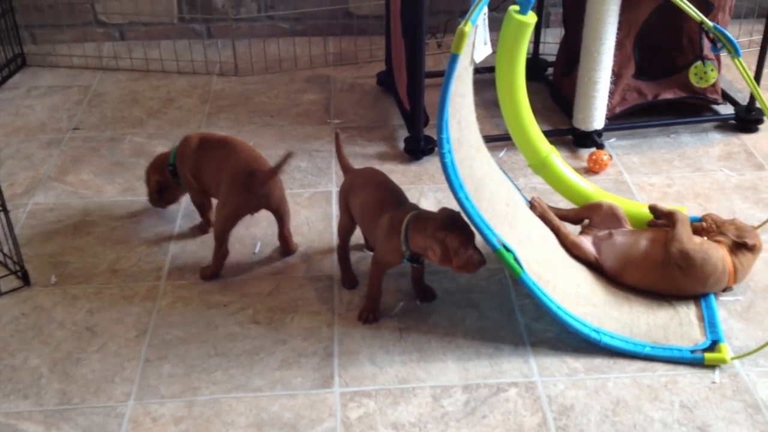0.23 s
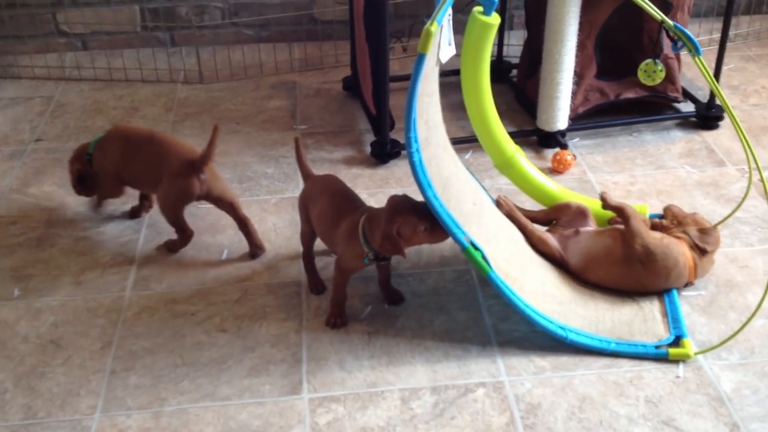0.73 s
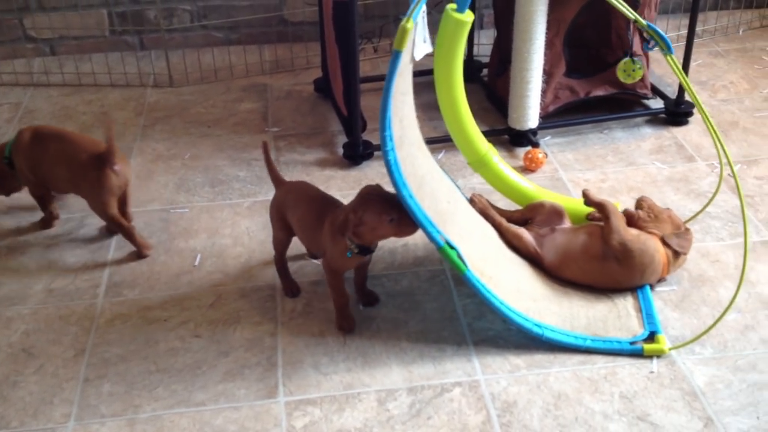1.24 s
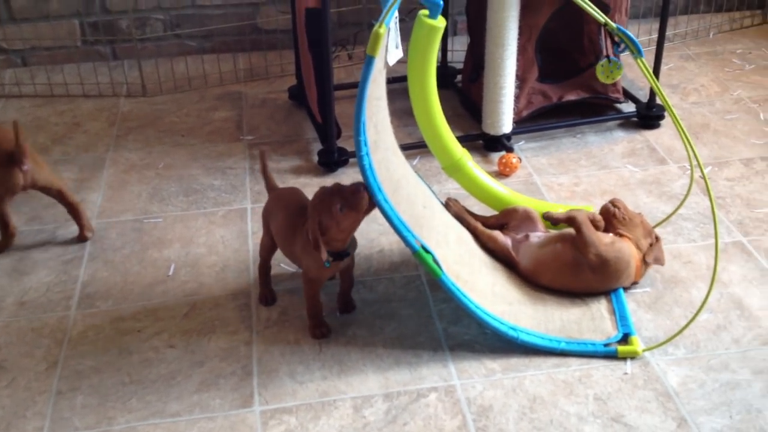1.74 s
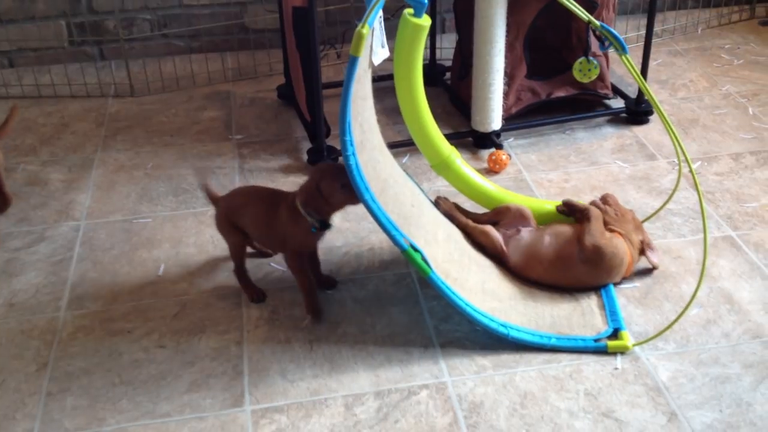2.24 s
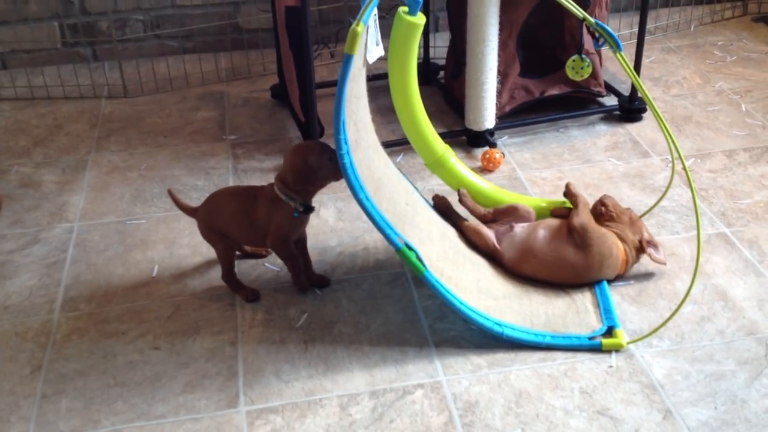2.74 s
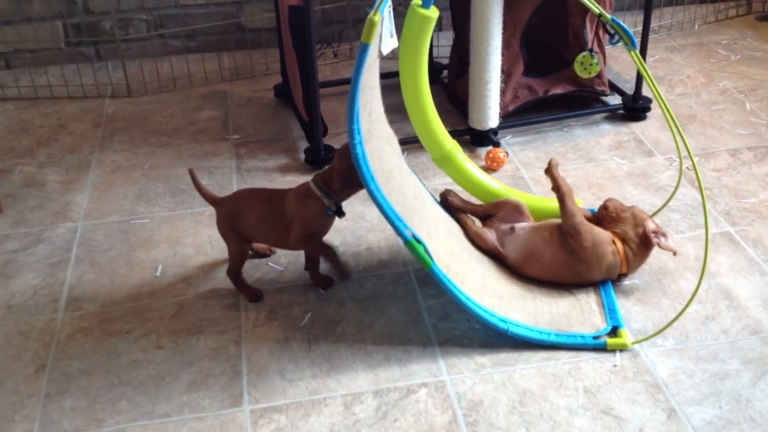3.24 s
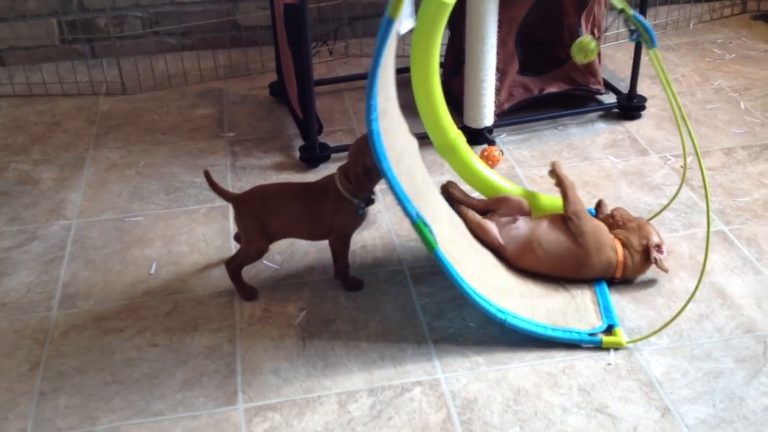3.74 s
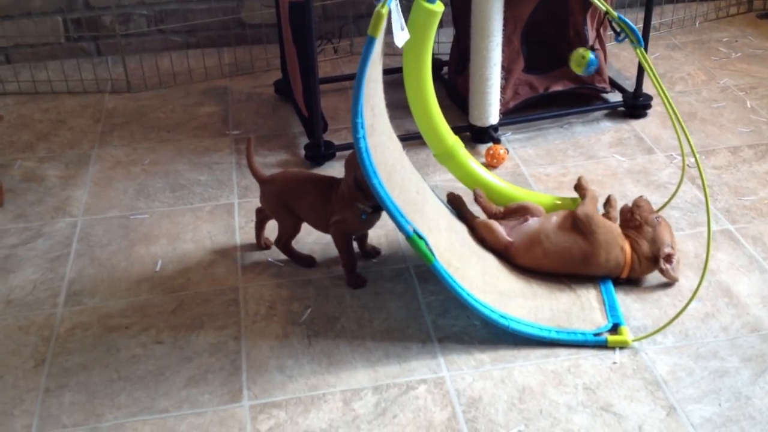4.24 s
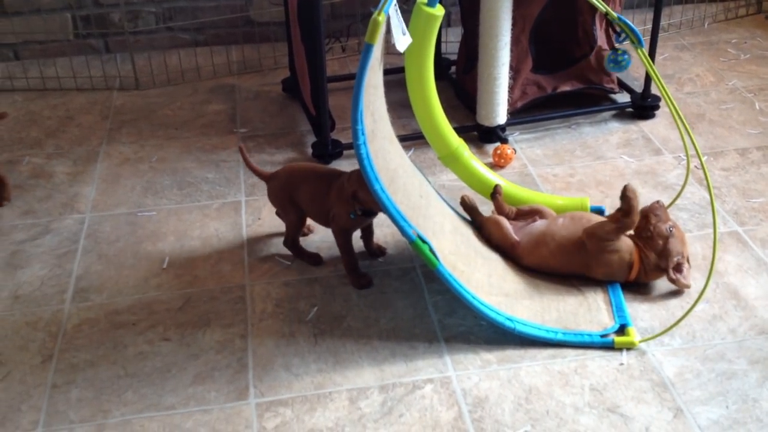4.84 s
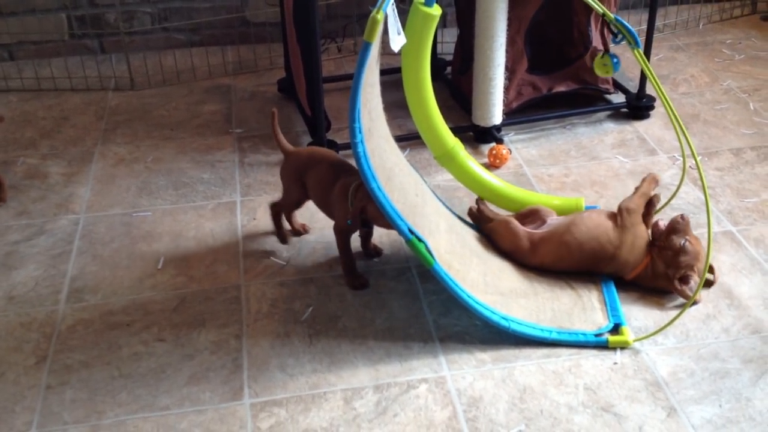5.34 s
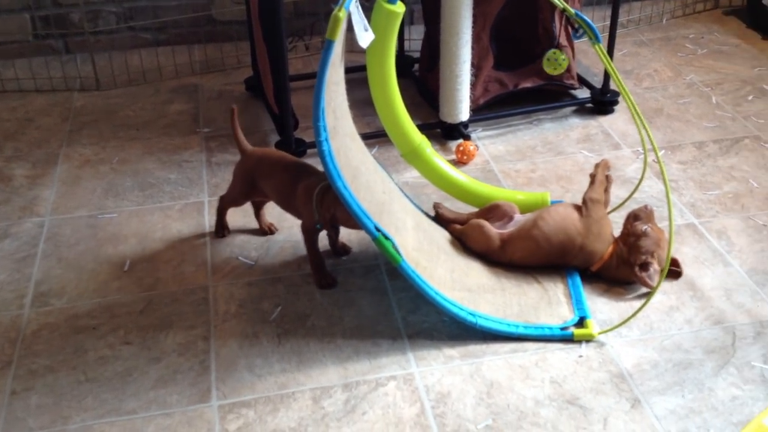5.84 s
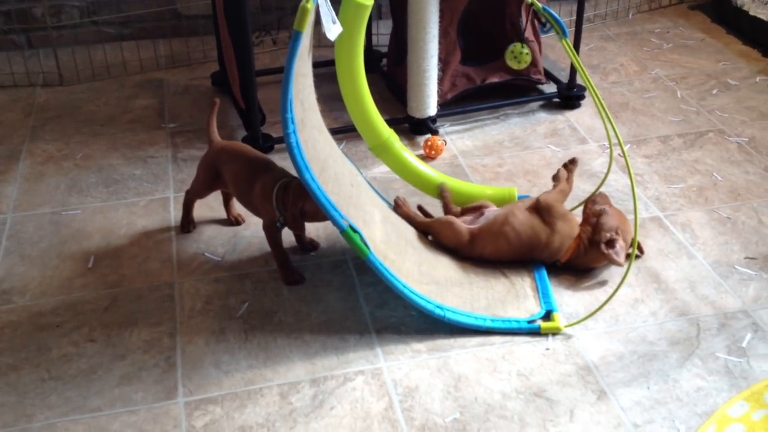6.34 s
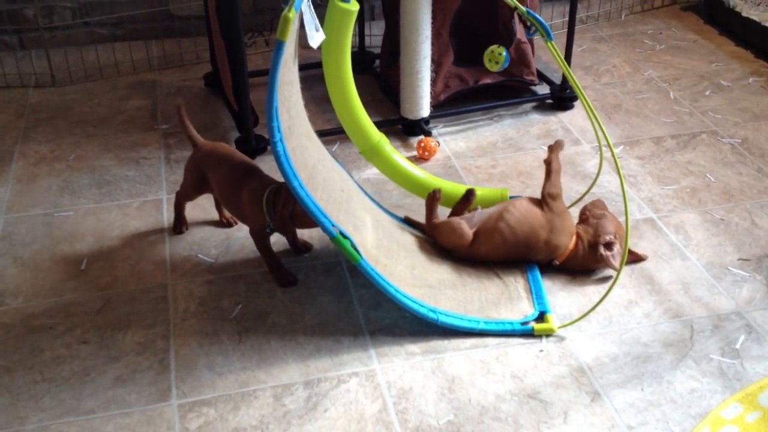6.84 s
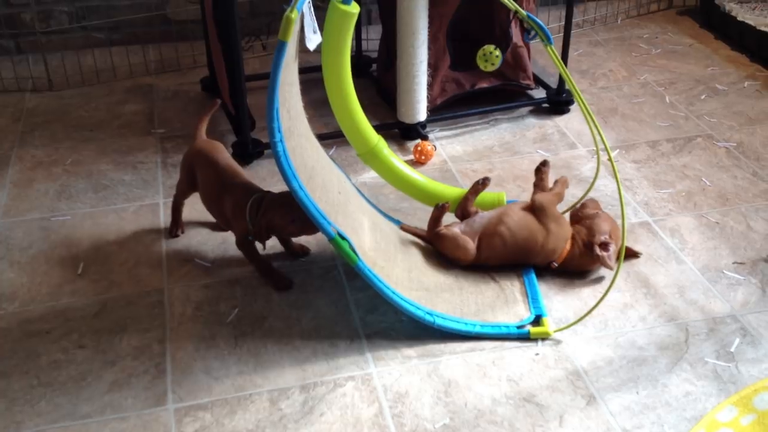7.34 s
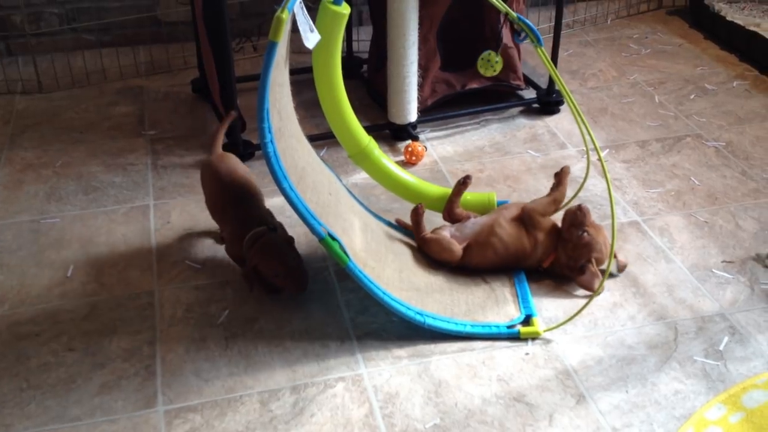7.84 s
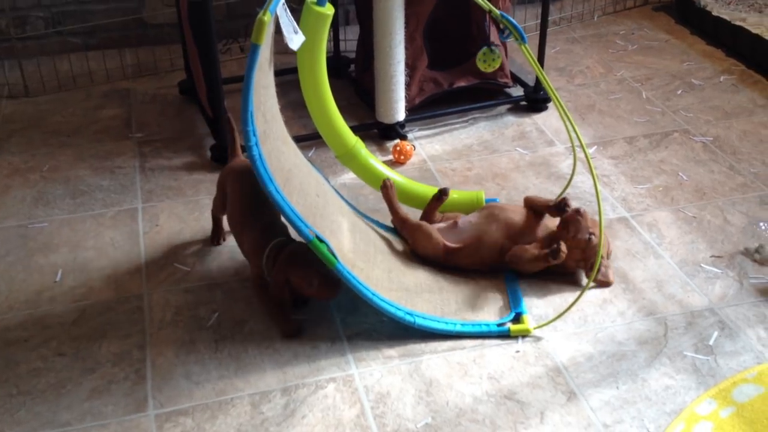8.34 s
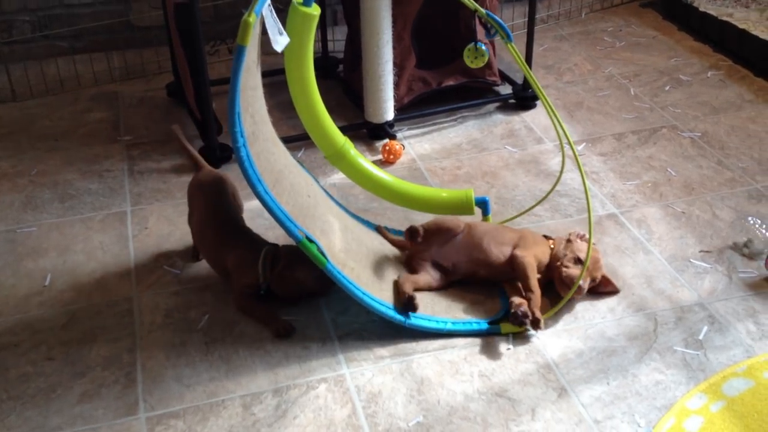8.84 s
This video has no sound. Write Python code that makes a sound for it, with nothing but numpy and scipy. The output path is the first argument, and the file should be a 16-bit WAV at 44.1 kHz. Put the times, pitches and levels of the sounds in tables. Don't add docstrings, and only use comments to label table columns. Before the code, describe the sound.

Puppies play on a tiled indoor floor a few metres from a small microphone. Light claws tick and skid, with a sharp cluster near one second. Around four seconds a hard snap and hollow frame knocks set a small bell ball rattling brightly. Later come one pinging tap, a low thud and a damped collar bell jingle, over soft rustling and quiet house hum.

```python
import sys
import numpy as np
from scipy import signal
from scipy.fft import rfft, irfft
from scipy.io import wavfile
from scipy.ndimage import uniform_filter1d

SR = 44100
rng = np.random.default_rng(int(sys.argv[2]) if len(sys.argv) > 2 else 0)


def pcm_store(signal):
    levels = np.round(np.clip(np.atleast_2d(signal), -1, 1) * 32767)
    wavfile.write(sys.argv[1], SR, levels.astype(np.int16).T)


def volts(x):
    e = np.asarray(x, float) / 20
    return 10 ** e


N = 400428

# start_s, peak_db, ring_hz, treble_db
TAPS = [(0.4562, -51, 1340, -21), (0.6416, -48, 4260, -17), (0.67, -50, 2170, -11),
        (0.7208, -34.5, 2510, -11), (0.7255, -33.5, 2860, -6), (0.9822, -24, 2870, 2),
        (1.2945, -50, 4020, -5), (2.739, -38, 2830, -4), (3.358, -44, 3390, 2.5), (3.3889, -36, 3580, -7),
        (3.658, -39.5, 3100, -5), (4.0945, -30, 4200, -1), (4.2238, -24.5, 2600, -6),
        (4.4127, -24.5, 3500, -1.5), (4.942, -40, 1470, -25), (6.7334, -41, 3500, -17),
        (8.398, -45, 2560, -11), (8.6557, -40, 3020, 1)]
TAPS_FAR = [(0.551, -53.5, 2350, -10), (0.828, -53, 3420, 1), (0.8444, -47.5, 1940, 7),
            (0.855, -43.5, 3400, -5), (1.4919, -52.5, 3300, -10), (1.717, -43, 1430, 8.5),
            (3.1512, -53, 2510, -19), (3.1852, -53, 1750, -13), (3.5472, -45, 1270, 7.5),
            (4.7325, -49.5, 1410, -10), (5.066, -48.5, 1240, -27), (6.0254, -45, 1510, 4),
            (6.1441, -40, 2750, -28), (6.3838, -38.5, 3400, -40), (6.543, -45.5, 1440, -1),
            (8.5225, -49, 4000, -12), (8.765, -51.5, 3130, -30), (9.0255, -48, 2750, 3)]
SNAPS = [(0.7506, -46, 2360, -27), (3.9698, -17, 3500, -1.5), (7.3324, -32.5, 3600, -9),
         (0.8548, -32, 3200, 1), (0.8615, -39, 3300, -8), (0.7, -47, 4000, 0), (0.9895, -26.5, 2800, -8),
         (0.9935, -29, 2900, -8), (0.9965, -31, 3000, -4), (1.0705, -32, 3200, -10),
         (1.0775, -39, 3300, -12), (1.2945, -42.5, 4200, 2), (1.1, -41, 4000, -8), (1.54, -48, 4500, 1),
         (2.1095, -44, 3500, -7), (2.7, -45, 3400, -10), (2.5, -41, 2700, -6), (6.9, -43, 5500, 0),
         (5.6, -46, 4500, 4), (7.1467, -47.5, 3140, -6), (3.027, -49, 4200, -6), (3.1, -42, 3000, -10),
         (0.9, -46, 5000, 4), (8.002, -45, 5500, 5)]
PINGS = [
    (1.071, -36, 3150, -14),
    (1.078, -32, 3300, -18),
    (2.108, -45.5, 2010, 9),
    (5.4155, -46, 2100, -9),
    (5.5008, -39.5, 3960, -1),
    (5.7198, -25, 2700, -22),
]
CRACKS = [
    (3.9698, -31.5, 3500, 9),
    (4.1066, -63, 4900, 0),
    (4.124, -69, 5200, 11),
    (4.4128, -38, 2700, -8),
    (6.3838, -41.5, 3040, 4),
]
# start_s, peak_db, ring_hz
KNOCKS = [
    (0.9821, -37.5, 1670),
    (3.9706, -31.5, 1184),
    (4.2212, -41.5, 1420),
    (4.413, -45, 1190),
    (5.7198, -42.5, 2000),
]
# start_s, peak_db, ring_hz
BOOMS = [
    (0.982, -51, 700),
    (3.97, -49.5, 780),
    (4.224, -47.5, 543),
    (4.413, -47.5, 790),
]


def taps():
    hollow_treble_db = -35
    kinds = [  # touches, echo_db, broad_db
        (TAPS, -7.5, 1.4), (TAPS_FAR, -1.2, 4.9), (SNAPS, -27, 1), (PINGS, -11.5, -16), (CRACKS, 0.3, 7.8),
        ([(*row, hollow_treble_db) for row in KNOCKS], 2, 0.21),
        ([(*row, hollow_treble_db) for row in BOOMS], -2.3, 8.5)]
    near, far = np.zeros(N), np.zeros(N)
    t = np.arange(int(.11 * SR)) / SR
    blow = 1. * (np.arange(len(t)) == int(.0012 * SR))
    for touches, echo_db, broad_db in kinds:
        for start_s, peak_db, ring_hz, treble_db in touches:
            slips = .2 * rng.standard_normal(len(t)) * np.exp(-t / .002)
            add(near, start_s, volts(peak_db) * touch(blow + slips, ring_hz, treble_db, broad_db))
            add(far, start_s, volts(peak_db + echo_db + 12) * touch(blow, ring_hz, treble_db, broad_db))
    return near, far


# start_s, peak_db, ring_hz, treble_db, length_ms
SKIDS = [(.131, -42, 3500, -4, 13), (0.134, -47.5, 3070, -33, 37), (0.727, -39, 2650, -11, 7),
         (0.745, -43, 1860, -20, 22), (0.942, -48, 2720, -20, 18), (1.545, -44.5, 2190, -22, 50),
         (1.6, -44, 1950, -16, 25), (1.692, -42, 4540, -0.5, 3.5), (1.924, -44, 2380, -1, 7),
         (1.929, -31.5, 1900, -23, 8.5), (1.932, -42, 2180, -22, 3.5), (2.257, -49.5, 2550, 1.5, 32),
         (2.303, -43, 1420, -11, 43), (3.74, -48, 2393, -12, 35), (3.80, -49, 2280, -15, 45),
         (3.84, -54, 2170, -11, 19)]
DRAGS = [
    (1.93, -38.5, 1170, -27, 10),
    (2.33, -44.5, 1070, -30, 16),
    (3.209, -32, 1710, -23, 9.3),
    (3.222, -40, 1240, -30, 11),
    (3.571, -42.5, 1110, -10, 28),
]
SCRAPES = [
    (0.726, -34, 2750, -22, 12),
    (7.885, -45, 7200, -0.5, 35),
    (7.9, -38, 2900, -20, 30),
    (7.862, -47, 4200, -4, 50),
    (7.876, -37, 3500, -10, 30),
    (7.892, -33, 2200, -25, 14),
]


def skids():
    near, far = np.zeros(N), np.zeros(N)
    t = np.arange(int(.11 * SR)) / SR
    for rows, echo_db, kind_broad_db in [(SKIDS, 8.26, 0), (DRAGS, 10, -7), (SCRAPES, -3, -7)]:
        for start_s, peak_db, ring_hz, treble_db, length_ms in rows:
            slip = rng.standard_normal(len(t))
            age = t * 3000 / length_ms
            force = even(age * np.exp(-age) * slip * np.abs(slip), 340)
            broad_db = kind_broad_db + 9 * np.log2(ring_hz / 2600)
            skid = volts(peak_db) * touch(force, ring_hz, treble_db, broad_db)
            add(near, start_s, skid)
            add(far, start_s, volts(echo_db) * skid)
    return near, far


def touch(force, ring_hz, treble_db, broad_db):
    body = band(force, ring_hz / 1.084, ring_hz * 1.11)
    crack = band(force, ring_hz / 1.62, min(ring_hz * 2.13, 5600), order=3)
    tick = band(force, 5700, 12350)
    parts = [(-10, body), (broad_db, crack), (treble_db, tick)]
    return sum(volts(db) * part / np.abs(part).max() for db, part in parts)


# start_s, peak_db, upper_db, t60_s
COLLAR = [(0.587, -68, 2, 0.61), (0.62, -58, -4, 0.1), (1.012, -55, -15, 0.1), (1.031, -49, -11, 0.12),
          (1.073, -54, -12, 0.18), (1.1492, -49.5, -15, 0.3), (1.208, -49.5, -7, 0.16),
          (1.248, -50, -10, 0.2), (2.04, -51.5, -17, 0.16), (2.0826, -54, -8, 0.43),
          (2.105, -52, -14, 0.17), (2.172, -59, -12, 0.15), (2.245, -50.5, -10, 0.3),
          (2.268, -48.5, -8, 0.12), (2.307, -53.5, -3, 0.22), (2.3675, -60, -8, 0.3),
          (2.685, -62, -12, 0.3), (3.4, -64, -15, 0.3), (3.44, -62, -15, 0.38), (5.5378, -68.5, -4, 0.26),
          (6.096, -60, -5, 0.18), (6.2232, -58, -7, 0.078), (6.2734, -64, -17, 0.091),
          (6.5015, -56.5, -10, 0.059)]
COLLAR_TURN = [(6.7963, -48.5, -35, 0.091), (6.8737, -50, -7, 0.23), (6.8834, -60, 7, 0.13),
               (6.9864, -63, 1, 0.066), (7.1735, -55, -8, 0.04), (7.3098, -49.5, -15, 0.16),
               (7.3553, -45, -5, 0.11), (7.3733, -39.5, -8, 0.057), (7.4108, -53, -29, 0.24),
               (7.534, -51.5, -23, 0.038), (7.7432, -50, -32, 0.074), (8.1119, -67, -25, 0.1),
               (8.169, -56.5, -29, 0.11), (8.181, -53, -12, 0.11), (7.975, -50.5, -6, 0.055),
               (8.312, -54, -6, 0.1), (8.3248, -43, -7, 0.3), (8.341, -45.5, -9, 0.097),
               (8.524, -59.5, 2, 0.18), (8.5943, -59, -9, 0.11), (8.6114, -53, -3, 0.15),
               (8.9235, -58, -25, 0.035)]
COLLAR_MUTED = [
    (7.3163, -34, -9, 0.023),
    (7.331, -29, -26, 0.01),
    (7.933, -23, -18.5, 0.011),
    (8.1915, -41, -15, 0.022),
]
# mode_hz, level_db, phase_rad
COLLAR_LOW = [(4250, -6, 2.9), (4300, 9.5, 0.54)]
# mode_hz, level_db
COLLAR_HIGH = [(10520, 0), (10810, -1), (11700, -18)]
# start_s, peak_db
PEA_TICKS = [(6.8834, -40), (7.309, -40), (7.3165, -34), (7.32, -33), (7.3565, -33), (7.36, -35),
             (7.3735, -28), (7.743, -44), (7.384, -45), (7.391, -51), (7.934, -40), (7.977, -45)]


def collar():
    out, t = np.zeros(N), np.arange(int(.5 * SR)) / SR
    strikes = np.array(sorted(list(COLLAR) + list(COLLAR_TURN) + list(COLLAR_MUTED)))
    waits_s = np.diff(strikes[:, 0], append=99)
    tick = band(1. * (t == 0), 5840, 7900)
    for (start_s, peak_db, upper_db, t60_s), wait_s in zip(strikes, waits_s):
        turn = rng.uniform(0, 2 * np.pi, 7)
        detune = 1 + 0.00046 * (turn[-1] - np.pi)
        low = sum(volts(db) * ring(t, hz * detune, t60_s, phase) for hz, db, phase in COLLAR_LOW) / 1.13
        high = sum(volts(db + turn[-2] - np.pi) * ring(t, hz, 0.017 + t60_s * .5, phase)
                   for (hz, db), phase in zip(COLLAR_HIGH, turn))
        attack_s = 0.0018 if t60_s < .026 else 0.00054 + 0.0084 * t60_s
        damp = fade(np.maximum(t - wait_s, 0), 0.04)
        tone = (low + volts(upper_db + 6.0) * high) * (1 - np.exp(-t / attack_s)) * damp
        add(out, start_s, volts(peak_db) * (tone + volts(upper_db + 27) * tick))
    for start_s, peak_db in PEA_TICKS:
        add(out, start_s, volts(peak_db) * ring(t, 6600, .0045))
    brush = unit(band(rng.standard_normal(N), 25, 130, order=1))
    return out * volts(1.3 * brush) + chimes(brush) + pea_roll(strikes)


# start_s, peak_db, pitch_hz, t60_s
TAGS = [(1.325, -59, 4800, 0.3), (1.36, -56, 4770, 0.4), (1.399, -66, 4800, 0.25), (2.469, -60, 6850, 0.16),
        (2.529, -54, 6800, 0.082), (3.74, -55.5, 4770, 0.43), (4.165, -41, 3570, 0.077),
        (4.52, -55, 3560, 0.24), (0.914, -56, 4600, .2), (1.195, -56, 6520, .15), (4.219, -39, 2580, .13),
        (4.745, -54, 1420, .25)]
SHELL = [
    (4.011, -49, 5360, .9),
    (4.1, -51, 5360, .9),
    (4.24, -49, 5360, .8),
    (4.13, -53, 5100, .9),
    (4.45, -54, 5100, .9),
    (4.449, -51, 5360, 1.1),
    (4.56, -53, 5360, .9),
    (4.84, -58, 5360, .8),
]


def chimes(brush):
    out, t = np.zeros(N), np.arange(int(.5 * SR)) / SR
    chatter = volts(2.5 * brush)
    for start_s, peak_db, pitch_hz, t60_s in TAGS + SHELL:
        tone = ring(t, pitch_hz, t60_s) * (1 - np.exp(-t / 0.0047))
        add(out, start_s, volts(peak_db) * tone * chatter[int(start_s * SR):][:len(t)])
    return out


def pea_roll(strikes):
    t = np.arange(int(.5 * SR)) / SR
    shaken = volts(1) * stirring()
    for start_s, peak_db, _, t60_s in strikes:
        add(shaken, start_s, volts(peak_db) * t60_s / 0.25 * fade(t, 0.3))
    low = unit(band(rng.standard_normal(N), 4262, 4312, order=1))
    high = unit(band(rng.standard_normal(N), 10600, 10640))
    return volts(-16.5) * shaken * (low + 0.18 * high)


# start_s, peak_db, pitch_hz, t60_s
BALL = [(3.5502, -45, 8500, 0.071), (3.6006, -44.5, 8400, 0.088), (3.627, -34.5, 8200, 0.049),
        (3.679, -39, 8200, 0.12), (3.971, -29, 8560, 0.042), (4.0941, -20, 8450, 0.035),
        (4.107, -27, 8500, 0.04), (4.125, -23, 8550, 0.043), (4.1372, -24.5, 8480, 0.074),
        (4.144, -32, 8580, 0.06), (4.2332, -39, 8170, 0.068), (4.283, -40, 8600, 0.074),
        (4.3035, -37, 8500, 0.1), (4.313, -34, 8500, 0.05), (4.322, -33.5, 8400, 0.11),
        (4.332, -37, 8500, 0.05), (4.346, -38, 8500, 0.06), (4.3828, -42, 8500, 0.047),
        (4.4132, -29.5, 8500, 0.037), (4.4836, -56, 8200, 0.051), (4.5016, -45, 8800, 0.048),
        (4.5196, -34, 8370, 0.028), (4.5345, -34.5, 8450, 0.21), (4.592, -35, 8480, 0.071),
        (4.6435, -40, 8330, 0.083), (4.7101, -55, 8400, 0.06), (4.788, -45.5, 8140, 0.055),
        (4.828, -39, 8760, 0.057), (4.8398, -35.5, 8520, 0.12), (4.876, -46, 8540, 0.06),
        (4.9395, -39, 8450, 0.024)]
BALL_FAR = [(1.2026, -56, 8140, 0.1), (1.247, -51, 8300, 0.16), (1.3379, -46, 8300, 0.088),
            (1.4216, -51, 8420, 0.078), (1.4519, -43, 8200, 0.055), (1.8157, -53, 8000, 0.1),
            (2.109, -50, 8300, 0.18), (2.2272, -59, 8200, 0.11), (2.4061, -67, 8200, 0.1),
            (2.419, -50, 8050, 0.053), (6.7619, -49, 8200, 0.074), (6.9241, -56, 8360, 0.11),
            (8.2275, -43, 8200, 0.03), (8.307, -43, 8000, 0.11), (8.34, -35, 8230, 0.05),
            (8.3669, -41, 8050, 0.23)]
# mode_hz, level_db, t60_s
BALL_MODES = [(5360, -34, 0.4), (5020, -31.5, 0.31), (15300, -17, 0.27), (12740, -14, 0.035),
              (13500, -20, 0.015), (10500, -10, 0.023)]
BALL_SPLIT = [1.009, .988]


def ball():
    out, t = np.zeros(N), np.arange(int(.3 * SR)) / SR
    for start_s, peak_db, pitch_hz, t60_s in list(BALL) + list(BALL_FAR):
        chance = rng.standard_normal(len(BALL_MODES))
        tick = rng.standard_normal(len(t))
        swinging = 3.9 < start_s < 5.0
        split_gain = 0.23 + 0.092 * swinging
        main = 0.54 * ring(t, pitch_hz, t60_s)
        main = main + sum(split_gain * ring(t, pitch_hz * ratio, 0.46 * t60_s) for ratio in BALL_SPLIT)
        rough = 1 + 0.71 * uniform_filter1d(tick, size=30) * np.sqrt(30)
        rest = sum(volts(db + c) * ring(t, hz + 25 * c, mode_t60_s, 9 * c)
                   for (hz, db, mode_t60_s), c in zip(BALL_MODES, chance))
        cage_gain = 1.3 * volts(0.24 * (peak_db + 21))
        cage = cage_gain * band(tick * fade(t, 0.013), 4400, 22000)
        rattle = main * rough + swinging * (rest * rough + cage)
        add(out, start_s, volts(peak_db) * rattle * (1 - np.exp(-t / 0.00074)))
    return out


# start_s, peak_db, pitch_hz, t60_s
THUD = [
    (3.99, -54.5, 168, 0.23),
    (4.228, -46.5, 260, 0.078),
    (4.138, -48, 198, 0.082),
    (5.675, -36.5, 223, 0.061),
]


def thuds():
    out, t = np.zeros(N), np.arange(int(.3 * SR)) / SR
    for start_s, peak_db, pitch_hz, t60_s in THUD:
        tone = ring(t, pitch_hz, t60_s) + 1.06 * ring(t, 1.36 * pitch_hz, 0.58 * t60_s)
        add(out, start_s, volts(peak_db) * tone * (1 - np.exp(-t / 0.0015)))
    return out


# start_s, swell_s, level_db, brightness_db
SHOVES = [(0.76, 0.035, -50, -3), (0.93, 0.071, -72, 3), (1.67, 0.12, -76, 12), (2.32, 0.1, -55, -28),
          (2.69, 0.075, -58, -15), (5.39, 0.068, -88, 23), (6.04, 0.057, -62, -4), (6.25, 0.2, -63, -17),
          (7.31, 0.096, -53, -7), (8.24, 0.076, -62, 4.5), (8.57, 0.091, -58.5, 3), (8.85, 0.21, -54, -4)]
# start_s, swell_s, level_db
CRINKLES = [(1.32, .04, -48.5), (1.43, 0.027, -49), (2.17, 0.066, -52.5), (3.54, 0.18, -70),
            (3.68, 0.14, -51.5), (4.15, 0.088, -47), (4.5, 0.15, -53), (4.65, 0.042, -54), (7.84, .03, -62),
            (8.32, 0.033, -58), (7.31, .06, -63), (8.8, 0.28, -65)]


def rustle():
    stir = stirring()
    shuffle = volts(-10.5) * stir
    pads = stir + sum(volts(db) * swell(s, swell_s) for s, swell_s, db, _ in SHOVES)
    cloth = volts(-3.5) * stir + sum(volts(db + bright_db) * swell(s, swell_s) for s, swell_s, db, bright_db in SHOVES)
    sheet = volts(-9) * stir + sum(volts(db) * swell(s, swell_s) for s, swell_s, db in CRINKLES)
    slips_per_s = 900
    slips = (rng.random(N) < slips_per_s / SR) * volts(3.74 * np.minimum(rng.exponential(size=N), 2.1))
    slips = uniform_filter1d(slips, size=24)
    slips = np.minimum(slips / slips.mean(), 3.2) + 1
    out = np.zeros(N)
    for gain, lo_hz, hi_hz in [(shuffle, 180, 720), (pads, 1000, 5600), (cloth, 4400, 9800), (sheet, 10800, 16500)]:
        out += gain * unit(band(slips * rng.standard_normal(N), lo_hz, hi_hz))
    return out


def swell(start_s, swell_s):
    t = np.arange(N) / SR - start_s
    return np.exp(-(t / swell_s) ** 2)


# time_s, level_db
STIR = [(0, -64), (0.55, -67.5), (0.9, -57), (1.899, -60), (2.5, -62.5), (2.8, -85), (3.1, -56.5),
        (3.4, -51), (3.85, -51), (4.5, -52.5), (4.75, -62.5), (5.3, -54.5), (5.9, -61.5), (6.5, -57),
        (7.1, -59.5), (7.6, -66.5), (8.1, -64.5), (9.08, -79)]


def stirring():
    time_s, level_db = np.transpose(STIR)
    return volts(np.interp(np.arange(N) / SR, time_s, level_db))


# freq_hz, density_db
HOUSE = [(25, -49), (65, -14), (95, -14.5), (140, -2.5), (400, -11), (700, -15.5), (1340, -17.5),
         (2600, -24), (3720, -18.5), (6000, -25)]


def house():
    freq_hz, density_db = np.transpose(HOUSE)
    f = np.maximum(np.arange(N // 2 + 1) * SR / N, 1)
    shape = volts(np.interp(np.log(f), np.log(freq_hz), density_db)) / (1 + (f / 7000) ** 3)
    return volts(-62) * unit(irfft(rfft(rng.standard_normal(N)) * shape, N))


# band_hz, t60_s
ROOM_T60 = [(300, 0.34), (800, 0.25), (2000, 0.3), (5000, 0.29), (10000, 0.29), (15000, 0.27)]


def room(x, gap_s=0.002):
    t = np.arange(int(.6 * SR)) / SR
    tail = sum(band(rng.standard_normal(len(t)), hz / 1.495, hz * 1.71) * fade(t, t60_s) for hz, t60_s in ROOM_T60)
    tail = even(tail, 40) * np.clip(t / gap_s - 1, 0, 1)
    return signal.fftconvolve(x, tail / np.sqrt(np.sum(tail ** 2)))[:N]


def unit(x):
    return x / np.sqrt(np.mean(x ** 2))


def band(x, lo_hz, hi_hz, order=2):
    sos = signal.butter(order, [lo_hz, min(hi_hz, SR / 2.1)], "band", fs=SR, output="sos")
    return signal.sosfilt(sos, x)


def fade(t, t60_s):
    return np.exp(-np.log(1000) * t / max(t60_s, .002))


def ring(t, hz, t60_s, phase_rad=0.):
    return np.sin(2 * np.pi * hz * t + phase_rad) * fade(t, t60_s)


def add(track, start_s, sound):
    i = int(start_s * SR)
    track[i:i + len(sound)] += sound[:N - i]


def even(x, fine_hz):
    spectrum = rfft(x)
    power = np.abs(spectrum) ** 2
    fine = uniform_filter1d(power, int(fine_hz * len(x) / SR))
    broad = uniform_filter1d(power, int(16 * fine_hz * len(x) / SR))
    return irfft(spectrum * np.sqrt(np.abs(broad / (fine + 1e-12))), len(x))


def scene():
    tap_near, tap_far = taps()
    skid_near, skid_far = skids()
    bells, cloth, drops = collar() + ball(), rustle(), thuds()
    echo = room(tap_far + skid_far + volts(-6.0) * bells + volts(-8.5) * cloth + volts(3) * drops)
    direct = tap_near + skid_near + bells + volts(-8.0) * cloth + drops
    return (direct + echo + house())[None]


def top_cut(x):
    return signal.sosfilt(signal.butter(12, 16600, fs=SR, output="sos"), x)


# freq_hz, width_hz, depth_db
MIC_DIPS = [(9700, 1600, -6), (5200, 150, -2)]


def record(dry):
    hiss_db, low_cut_hz, top_hz = -68, 45, 15200
    f = np.arange(N // 2 + 1) * SR / N
    port_db = sum(db / (1 + (2 * (f - hz) / width_hz) ** 2) for hz, width_hz, db in MIC_DIPS)
    top_db = -40 * np.clip((f - top_hz) / 300, 0, 1)
    low_cut = f ** 2 / (f ** 2 + low_cut_hz ** 2)
    hissing = dry + volts(hiss_db) * rng.standard_normal(N)
    heard = irfft(rfft(hissing) * low_cut * volts(port_db + top_db), N)
    return top_cut(heard)


dry = scene()
out = record(dry)
pcm_store(out)
```